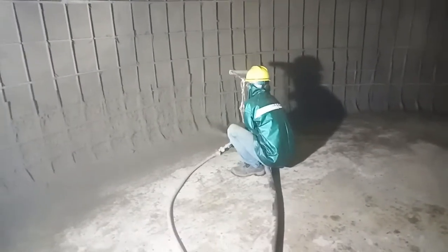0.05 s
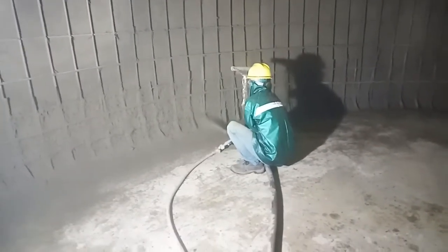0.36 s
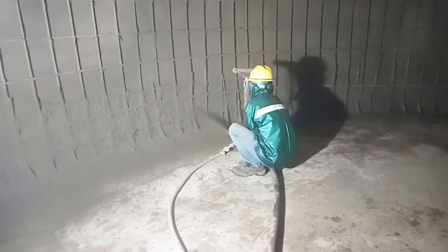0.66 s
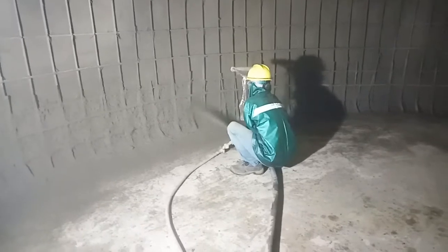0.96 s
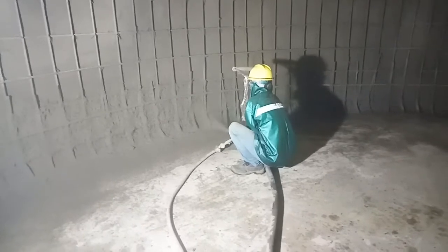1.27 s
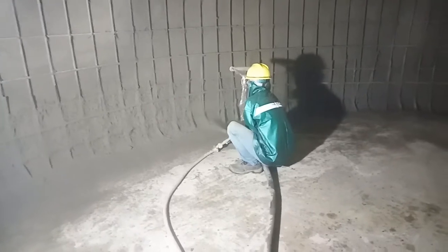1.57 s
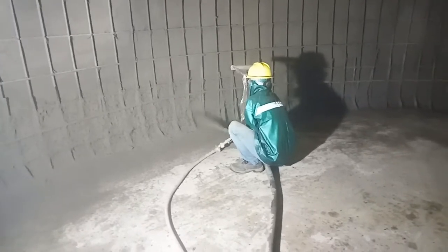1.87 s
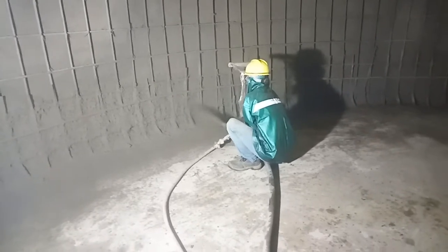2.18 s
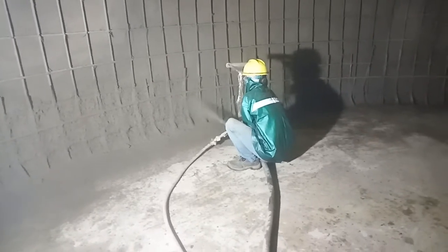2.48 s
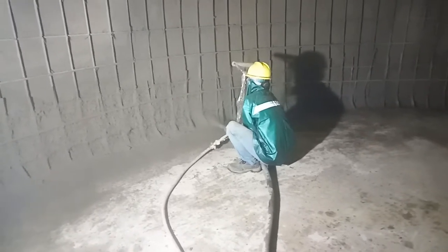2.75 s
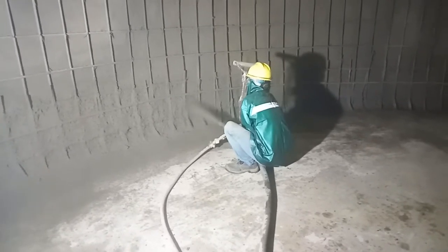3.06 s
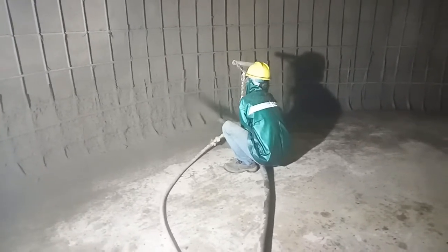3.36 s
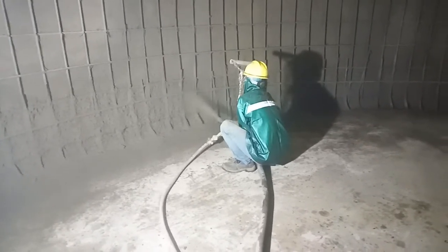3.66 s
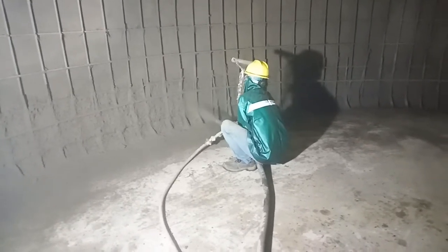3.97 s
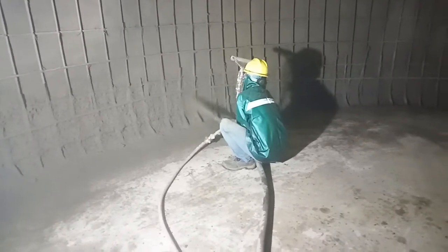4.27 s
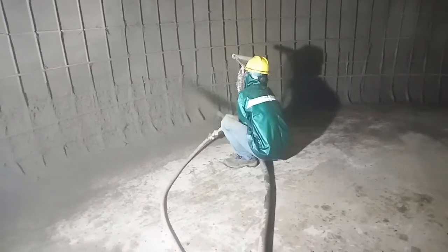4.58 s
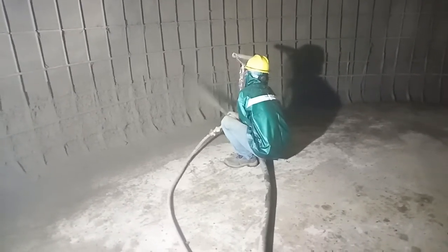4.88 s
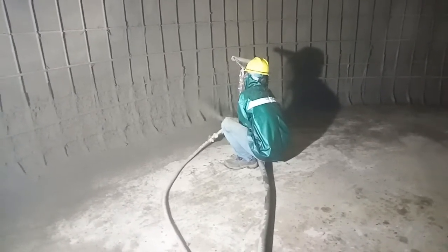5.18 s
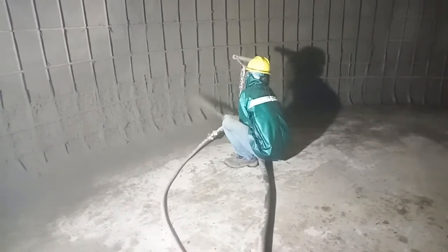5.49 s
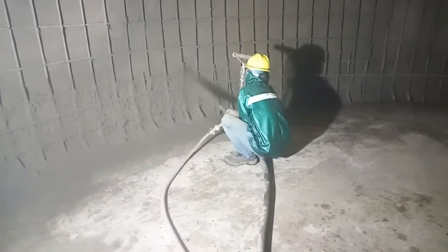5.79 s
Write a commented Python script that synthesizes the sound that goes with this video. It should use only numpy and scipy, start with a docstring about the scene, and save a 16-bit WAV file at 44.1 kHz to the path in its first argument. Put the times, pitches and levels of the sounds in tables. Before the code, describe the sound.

A hose sprays wet concrete onto the wall of a concrete shaft, and a loud, sputtering rush of compressed air runs throughout. The sound starts at the end of one surge, with an air blast and a short squeal. Further surges of mix build and peak at about 0.9, 2.2, 3.4 and 4.9 seconds, with a weaker one rising at the very end. Each brings a low thudding roar, gritty spatter, a dull slap and a slight boom from the walls, then dribbles away. Right after the peaks, at about 1.0, 2.3, 3.6 and 4.9 seconds, the air blows clear for roughly half a second with a sharper, ringing hiss. High, hoarse whistles come with these blasts, some gliding slightly, some stuttering. One lingers until 3 seconds, and a last faint chirp comes near 5.7 seconds.

```python
"""A roar and spatter of sprayed concrete hitting a shaft wall, one slug of mix per pump stroke.
After each slug the compressed air blows through, hissing in the resonances of the nozzle
and squealing past wet lumps. The concrete walls reflect the spray and boom on a few low modes."""
import sys
import numpy as np
from scipy import signal
from scipy.fft import rfft, irfft, next_fast_len
from scipy.io import wavfile
from scipy.ndimage import uniform_filter1d, minimum_filter1d, map_coordinates

SR = 44100
rng = np.random.default_rng(int(sys.argv[2]) if len(sys.argv) > 2 else 0)


def file_out(sig):
    """Save sig as 16-bit WAV at sys.argv[1]."""
    # one column per channel
    cols = np.atleast_2d(sig).T
    # limit, then scale
    lim = np.clip(cols, -1, 1)
    pcm = np.round(lim * 32767).astype(np.int16)
    wavfile.write(sys.argv[1], SR, pcm)


N = 266364
t = np.arange(N) / SR

# Impact spectra. Each row: frequency in Hz, relative level in dB.
ROAR_SPECTRUM = [(25, -54), (45, -33), (65, -29), (90, -25), (120, -5.5), (200, -1), (330, 1), (420, -2.5),
                 (600, -9), (1200, -18), (3000, -72)]
SPATTER_SPECTRUM = [(25, -60), (150, -34), (400, -13), (620, -0.5), (1000, 0), (1400, -3.5), (2200, 3.5),
                    (4000, -14.5), (9000, -29.5)]
# Shaft modes and the lowest boom. Each row: centre in Hz, half-width in Hz, relative level in dB.
SHAFT_MODES = [(148, 4.8, -15), (204, 19, -3.5), (260, 5.2, 4.5), (323.4, 27, -1), (650, 18, -7)]
BOOM_MODES = [(69, 6, -15), (95.5, 9.6, 5.5)]

def concrete():
    """Lumps thud on the wall, gravel spatters, the shaft booms in sympathy."""
    roar_db, spatter_db, boom_db, _ = mix_flow()
    thuds = coloured(impacts(per_s=2500, spread_db=2.5), ROAR_SPECTRUM)
    roar = amp(roar_db + 1.05 * wobble(13)) * (amp(-1.2) * thuds + amp(-4) * resonant(SHAFT_MODES))
    gravel = walls(impacts(per_s=5000, spread_db=2), echo_db=-13.5, longest_s=.03, sway_s=.0003, count=8)
    spatter = amp(spatter_db + 0.57 * wobble(14)) * coloured(gravel, SPATTER_SPECTRUM)
    boom = amp(boom_db) * resonant(BOOM_MODES)
    return roar + spatter + boom


# Each row: crest, hold and build-up in seconds, rise of roar, spatter and boom in dB,
# relative mist level in dB, slap pitch in Hz, slap level in dB.
SLUGS = [(-.1, .12, .6, 11, 4.5, 4, -43, 337, -33), (0.941, 0.13, 0.71, 15, 6.5, 13.5, -33.5, 510, -28.5),
         (2.242, 0.091, 0.87, 14.5, 9.5, 10.5, -31.5, 310, -20),
         (3.413, 0.17, 0.52, 15.5, 10.5, 6.5, -32, 167, -27.5),
         (4.853, 0.14, 0.72, 11, 8, 15, -36.5, 252, -30.5), (5.973, .12, 0.37, 8, 4.5, 14.5, -45, 315, -46)]

def mix_flow(mist_swell_db=14.5):
    """Roar, spatter, boom and mist follow the load of the passing slug."""
    roar_db, spatter_db, boom_db = -34.5, -29.5, -47.5  # thin trickle between slugs
    mist_gain = 0
    for crest_s, hold_s, build_s, roar_rise_db, spatter_rise_db, boom_rise_db, mist_db, *_ in SLUGS:
        load = slug_load(crest_s, hold_s, build_s)
        roar_db += roar_rise_db * load
        spatter_db += spatter_rise_db * load
        boom_db += boom_rise_db * load
        mist_gain += (load > 0) * amp(mist_db - mist_swell_db * (1 - load))
    return roar_db, spatter_db, boom_db, mist_gain


def slug_load(crest_s, hold_s, build_s, break_share=0.39, break_s=0.058, dribble_s=0.66):
    """Load of one slug, 0-1: it gathers, holds, breaks off and dribbles out."""
    age_s = t - crest_s
    gathered = np.clip(1 + age_s / build_s, 0, 1) ** 1.48
    left = lambda fall_s: np.clip(1 - (age_s - hold_s) / fall_s, 0, 1)
    return gathered * (break_share * left(break_s) + (1 - break_share) * left(dribble_s))


def slaps(swell_db=23, width_ratio=0.17, low_cut_hz=90):
    """At its crest each slug slaps the wall with a lumpy body of its own pitch."""
    out = np.zeros(N)
    for crest_s, hold_s, build_s, *_, pitch_hz, db in SLUGS:
        load = slug_load(crest_s, hold_s, build_s)
        body = resonant([(pitch_hz, width_ratio * pitch_hz, 0)])
        out += (load > 0) * amp(db - swell_db * (1 - load)) * body
    return filtered(out * amp(2.2 * wobble(18)), lambda hz: np.minimum(hz / low_cut_hz, 1) ** 2)


# Air spectra. Each row: frequency in Hz, relative level in dB.
JET_SPECTRUM = [(30, -70), (600, -33), (1400, -11), (1750, -5), (2100, -3.5), (2550, 0), (3000, 0),
                (3550, -2), (3950, -5.5), (4300, -15.5), (4800, -25.5), (7000, -37)]
HISS_SPECTRUM = [(200, -66), (2500, -9), (4000, 3), (4400, 5.5), (4750, 1.5), (5250, 1.5), (5900, -1),
                 (6500, -7.5), (7000, -8.5), (7700, -12.5), (8400, -9.5), (9300, -12.5), (9900, -19),
                 (15500, -18)]
MIST_SPECTRUM = [(300, -70), (6000, 2), (9000, -19), (10000, -35), (10800, -9.5), (11350, 2), (12200, -4.5),
                 (13000, 0.5), (13550, 2), (14400, 1), (15400, -0.5)]

def air():
    """The jet sputters as mix passes; running clear, it rings and hisses more sharply."""
    jet_gain, hiss_gain, bore_gain, air_mist = air_flow()
    *_, slug_mist = mix_flow()
    sputter = amp(0.5 * wobble(28) + 0.24 * wobble(110))
    flutter = amp(1.5 * wobble(40))  # resonances catch and let go
    ring_share = np.interp(20 * np.log10(hiss_gain), [-39, -30], [.25, .72])
    rush = np.sqrt(1 - ring_share) * coloured(turbulence(), JET_SPECTRUM)
    jet = jet_gain * (rush + np.sqrt(ring_share) * flutter * nozzle_ring())
    bore = bore_gain * np.sqrt(ring_share) * resonant([(1827, 64, 0)])
    hollow = turbulence(echo_db=-6, longest_s=.006, sway_s=.00005)  # combed close to the wall
    hiss = hiss_gain * coloured(hollow, HISS_SPECTRUM)
    sandy_air = turbulence() + 0.45 * impacts(per_s=2300, spread_db=2)
    mist = np.hypot(air_mist, slug_mist) * coloured(sandy_air, MIST_SPECTRUM)
    return sputter * (jet + bore + amp(1.5) * (hiss + mist))


# Nozzle modes, one set per stroke. Each row: centre in Hz, half-width in Hz, relative level in dB.
RING_A = [(2620, 80, 1), (3060, 64, -0.5), (3514, 94, 1.5), (4140, 100, -8.5)]
RING_B = [(2596, 64, 1), (2840, 50, -2.5), (3090, 67, -5.5), (3463, 56, 0.5), (3770, 100, -7),
          (4170, 49, -13.5)]
RING_C = [(2420, 100, -2), (2620, 79, -2.5), (3216, 180, 2.5), (3627, 49, 2.5), (3870, 79, -1.5),
          (4370, 46, -12)]
RING_D = [(2480, 180, -3.5), (3230, 180, 1), (3580, 33, 3.5), (3960, 44, -5.5), (4200, 40, -11)]
RING_E = [(2380, 170, -4), (2660, 42, -5), (3006, 29, 2.5), (3240, 70, 1.5), (3595, 71, 1),
          (3960, 130, -7.5)]

def nozzle_ring(lead_s=0.22, fade_s=0.24):
    """The wet lining shifts the nozzle's resonances just before each blast."""
    begun = [np.clip((t - start_s + lead_s) / fade_s, 0, 1) for start_s, *_ in BLASTS] + [np.zeros(N)]
    crossfades = np.sqrt(np.abs(np.diff(begun, axis=0)))
    return sum(fade * resonant(modes) for fade, (*_, modes) in zip(crossfades, BLASTS))


# Each row: start and hold in seconds, release in dB/s, relative jet and hiss levels in dB,
# hiss growth in dB/s, relative bore level in dB, nozzle modes.
BLASTS = [(-.2, .46, 52, -16.5, -27.5, -4, -47, RING_A), (0.987, 0.6, 43, -16.5, -29, 0, -42, RING_B),
          (2.26, 0.46, 54, -18.5, -32, 9.5, -30.5, RING_C),
          (3.602, 0.52, 54, -17.5, -29, -4.5, -27.5, RING_D),
          (4.853, 0.49, 65, -15.5, -28.5, 6, -22.5, RING_E)]
# Each row: time in seconds, jet level in dB.
STEADY_AIR = [(0, -20), (.85, -20.5), (2.0, -19.7), (3.0, -18), (3.45, -17), (4.3, -19.5), (4.7, -22),
              (5.9, -23)]

def air_flow(attack_s=.075):
    """Gains of jet, hiss, bore and mist: over the steady air each blast opens, holds and bleeds away."""
    steady_db = np.interp(t, *np.transpose(STEADY_AIR))
    power = np.outer(amp([0, -19.5, -12.5, -21]), amp(steady_db)) ** 2
    for start_s, hold_s, release_db_s, jet_db, hiss_db, growth_db_s, bore_db, _ in BLASTS:
        age_s = t - start_s - attack_s
        blast = np.clip(1 + age_s / attack_s, 0, 1) * amp(-release_db_s * np.maximum(age_s - hold_s, 0))
        hiss = blast * amp(hiss_db + growth_db_s * np.clip(age_s, 0, hold_s))
        power += np.array([blast * amp(jet_db), hiss, blast * amp(bore_db), hiss * amp(-12.5)]) ** 2
    return np.sqrt(power)


# Each row: start and end in seconds, start and end pitch in Hz, half-width in Hz, level in dB,
# stutter depth 0-1.
SQUEALS = [(0.0, 0.107, 3000, 3055, 110, -17, 0), (0.0, 0.4, 5900, 5850, 110, -42, 0.1),
           (1.05, 1.332, 2716, 2807, 120, -18, 0), (1.056, 1.25, 3290, 3370, 110, -18, 0),
           (1.168, 1.451, 5780, 4970, 200, -28.5, 0), (2.259, 2.384, 2440, 2430, 50, -18, 0),
           (2.29, 2.58, 5180, 5140, 160, -33, 0.2), (2.53, 2.65, 5000, 5190, 90, -30, 0.4),
           (2.55, 2.998, 2600, 2600, 40, -23, 0), (2.644, 3.016, 5190, 5200, 60, -36, .9),
           (3.492, 3.719, 2960, 3060, 55, -19, 0.3), (3.662, 3.853, 6350, 6100, 280, -33.5, 0),
           (3.799, 4.206, 5400, 5380, 110, -34, 0.2), (4.881, 5.138, 2313, 2620, 110, -17, 0),
           (4.89, 5.012, 3535, 3530, 130, -18, 0.3), (5.138, 5.491, 6330, 6380, 110, -36, 0.2),
           (5.282, 5.622, 3310, 3255, 110, -18, 0), (5.718, 5.81, 3010, 3020, 35, -27, 0)]

def squeals(stutter_hz=12):
    """Air forced past wet lumps whistles hoarsely, gliding and stuttering as the gap changes."""
    out = np.zeros(N)
    for start_s, end_s, start_hz, end_hz, width_hz, db, stutter in SQUEALS:
        span = (t >= start_s) & (t < end_s)
        progress = (t[span] - start_s) / (end_s - start_s)
        phase = 2 * np.pi * np.cumsum(start_hz + (end_hz - start_hz) * progress) / SR
        lowpass = signal.butter(2, width_hz, fs=SR, output="sos")
        drift = signal.sosfilt(lowpass, rng.standard_normal((2, SR)))[:, -len(progress):]
        tone = unit(drift[0] * np.cos(phase) + drift[1] * np.sin(phase))
        cycles = stutter_hz * (t[span] - start_s) + 0.12 * wobble(11)[span]
        chirps = 1 - stutter * np.cos(2 * np.pi * cycles)
        out[span] += amp(db) * np.sqrt(np.abs(np.sin(np.pi * progress))) * unit(chirps * tone)
    return out


def turbulence(echo_db=-9.5, longest_s=.012, sway_s=.00007):
    """Air noise with its reflections."""
    return walls(rng.standard_normal(N), echo_db, longest_s, sway_s, count=6)


def walls(x, echo_db, longest_s, sway_s, count):
    """Near reflections comb the sound; their delays drift as the nozzle sways."""
    heard = x.copy()
    for delay_s in rng.uniform(longest_s / 10, longest_s, count):
        lag = (delay_s + sway_s * wobble(2.5)) * SR
        heard += amp(echo_db) * x[np.round(np.arange(N) - lag).astype(int) % N]
    return heard


def impacts(per_s, spread_db):
    """Dense hail of uneven impulses, rms 1."""
    hits = rng.random(N) < per_s / SR
    return unit(hits * rng.standard_normal(N) * amp(spread_db * rng.standard_normal(N)))


def resonant(modes):
    """Noise ringing in steep-sided resonances, rms 1."""
    response = lambda f: sum(amp(db) / (1 + ((f - hz) / width_hz) ** 2) for hz, width_hz, db in modes)
    return unit(filtered(rng.standard_normal(N), response))


def coloured(x, spectrum):
    """x shaped by a spectrum table, rms 1."""
    knots_hz, db = np.transpose(spectrum)
    return unit(filtered(x, lambda hz: amp(np.interp(np.log(hz + 1), np.log(knots_hz), db))))


def filtered(x, response):
    """x through a gain given as a function of Hz."""
    size = next_fast_len(N + SR // 2)
    return irfft(rfft(x, size) * response(np.fft.rfftfreq(size, 1 / SR)), size)[..., :N]


def wobble(knots_per_s):
    """Smooth random curve."""
    return map_coordinates(rng.standard_normal(int(N * knots_per_s / SR) + 4), [t * knots_per_s])


def amp(db):
    """Decibels to gain."""
    return 10 ** (np.asarray(db) / 20)


def unit(x):
    """Scale to rms 1."""
    return x / np.sqrt(np.mean(x ** 2) + 1e-20)


def scene():
    """Concrete and air, alike in both channels."""
    spray = concrete() + slaps() + air() + squeals()
    return np.array([spray, spray])


def record(dry, ceiling=.88, top_hz=15550):
    """Peak limiter, then a brick-wall low-pass."""
    needed = np.minimum(1, ceiling / (np.abs(dry).max(axis=0) + 1e-9))
    gain = uniform_filter1d(minimum_filter1d(needed, size=400), size=300)
    return filtered(dry * gain, lambda hz: hz < top_hz)


dry = scene()
out = record(dry)
file_out(out)
```